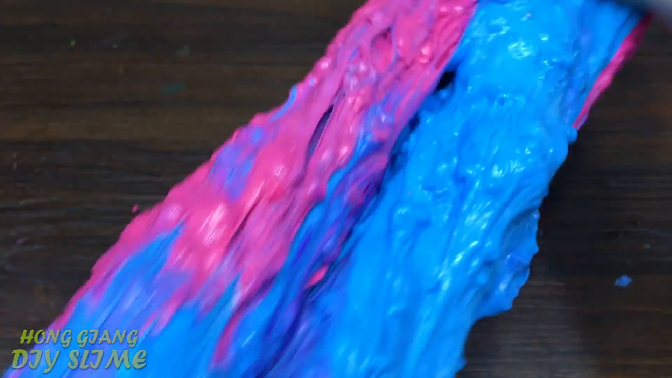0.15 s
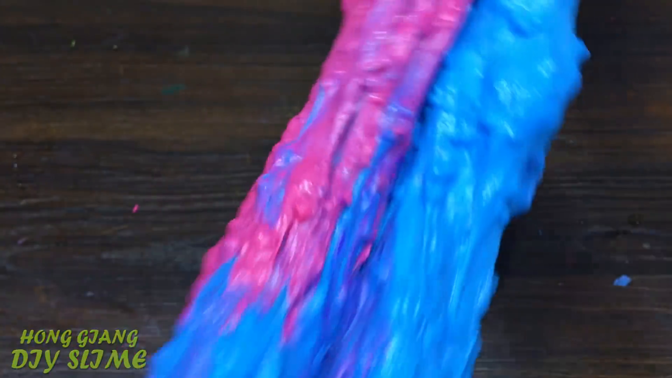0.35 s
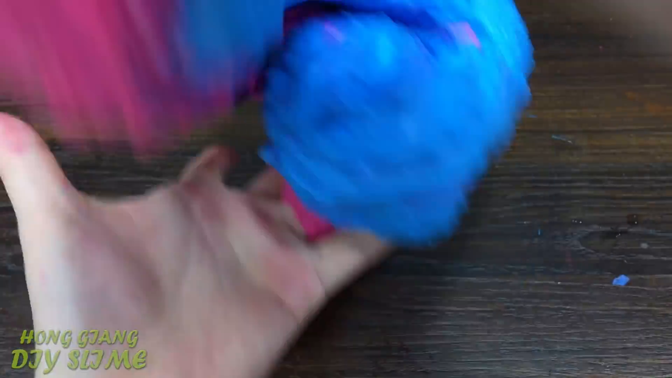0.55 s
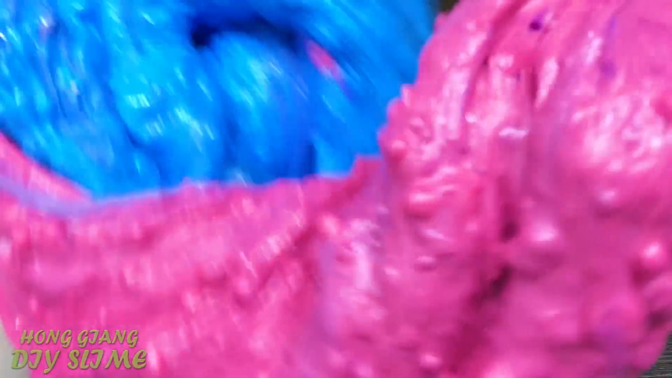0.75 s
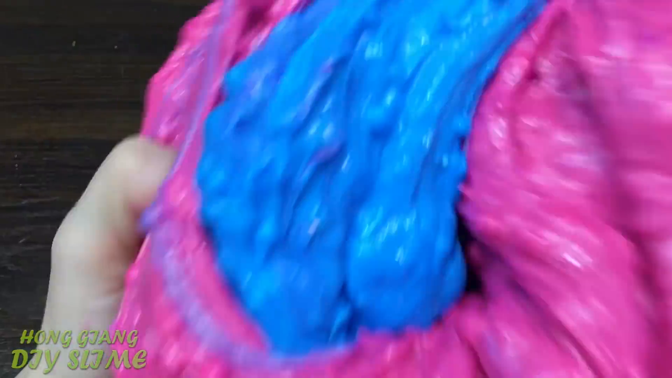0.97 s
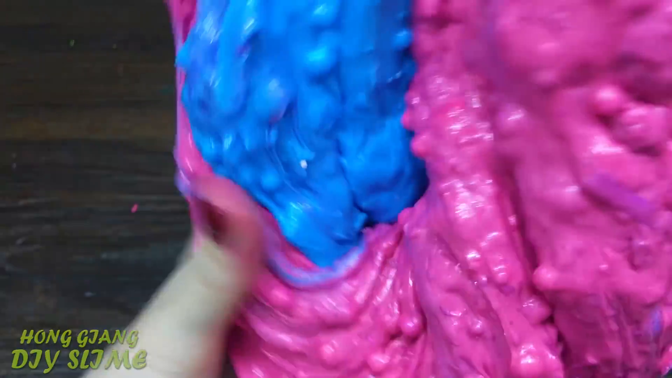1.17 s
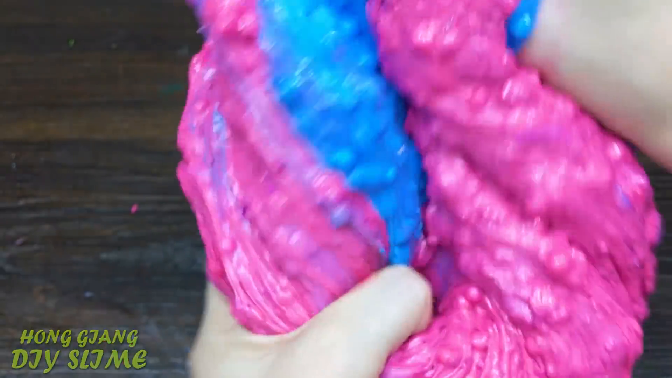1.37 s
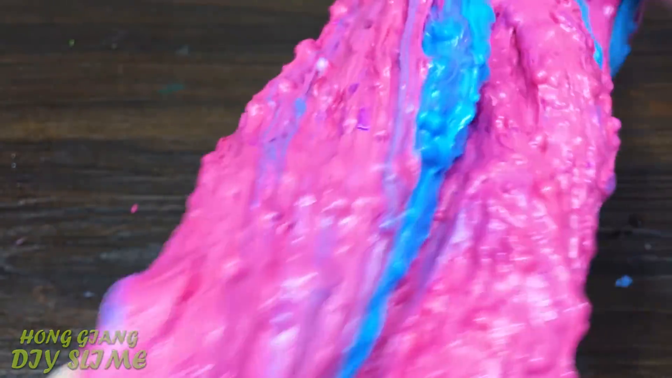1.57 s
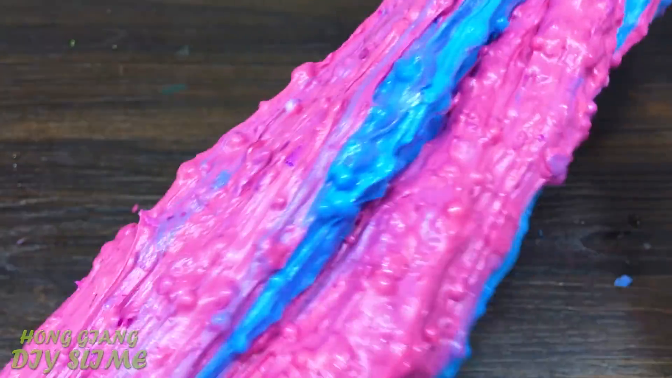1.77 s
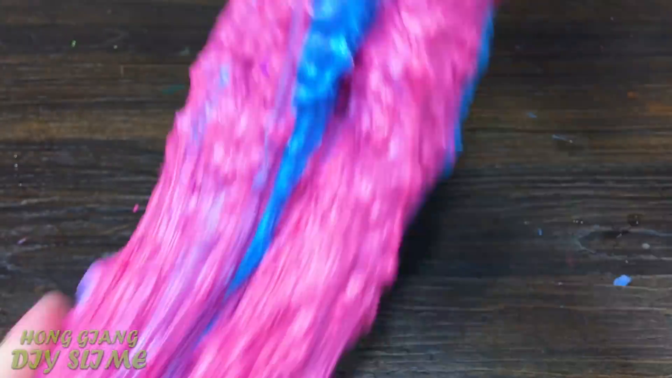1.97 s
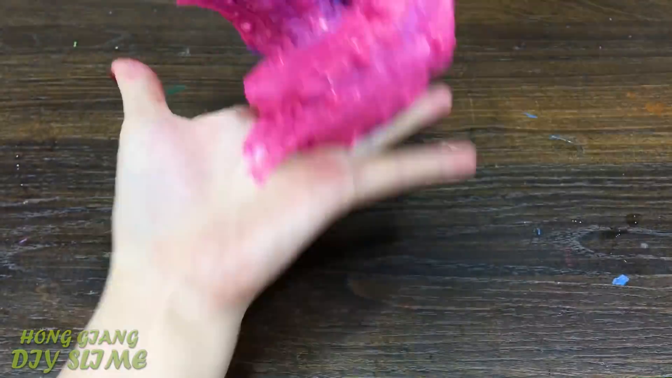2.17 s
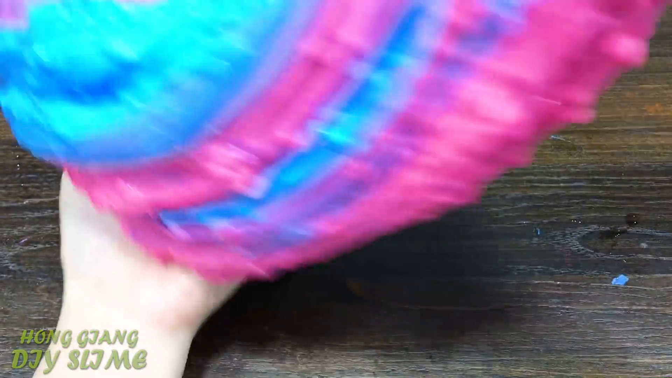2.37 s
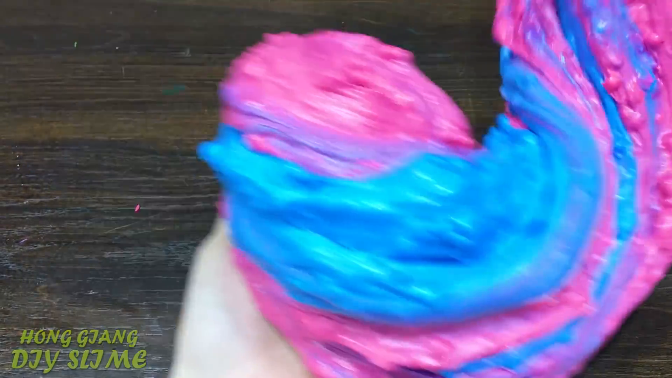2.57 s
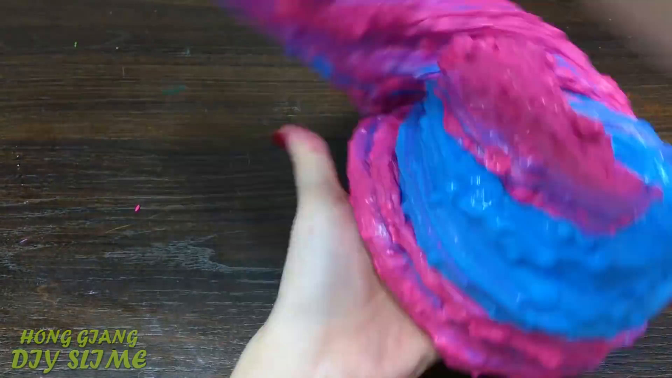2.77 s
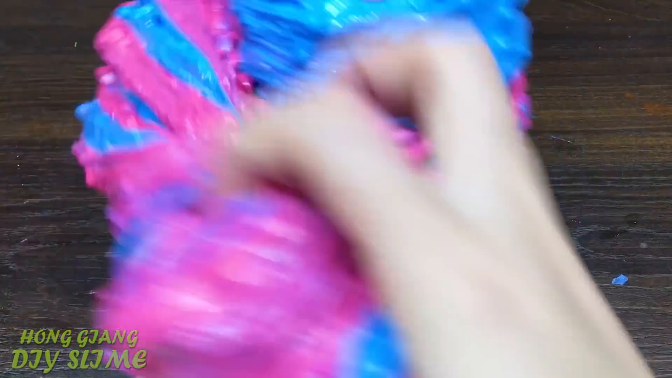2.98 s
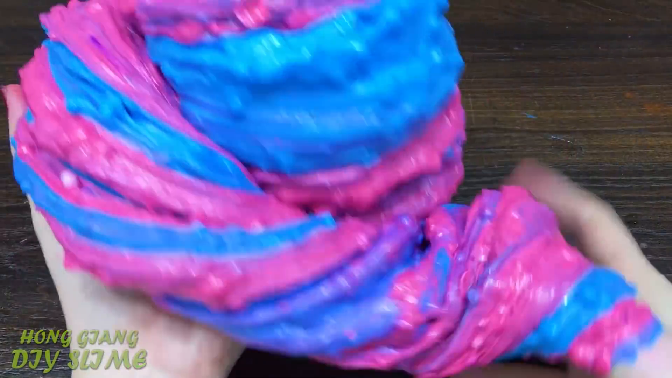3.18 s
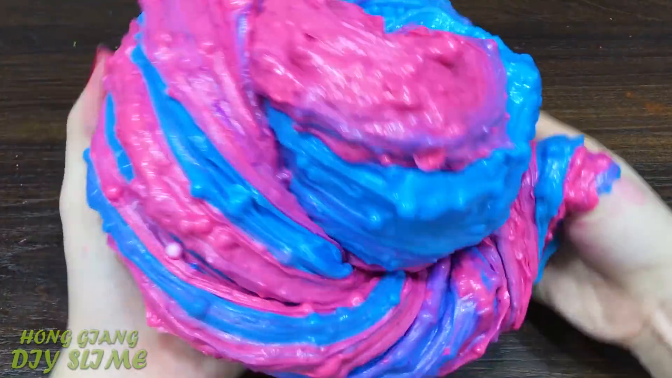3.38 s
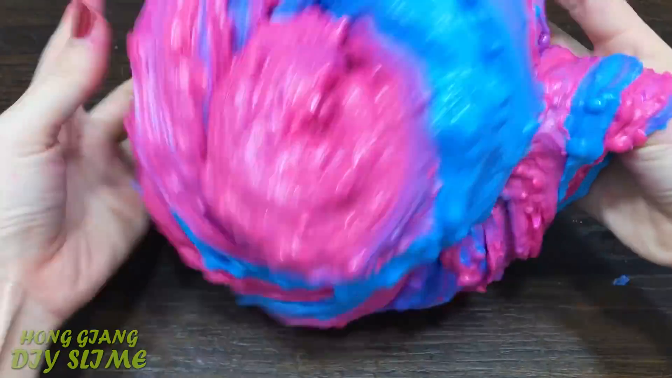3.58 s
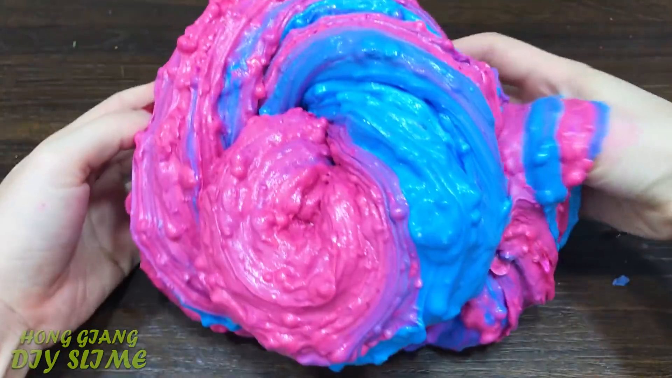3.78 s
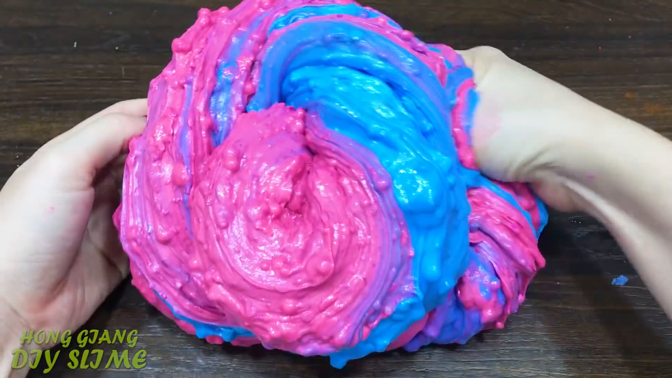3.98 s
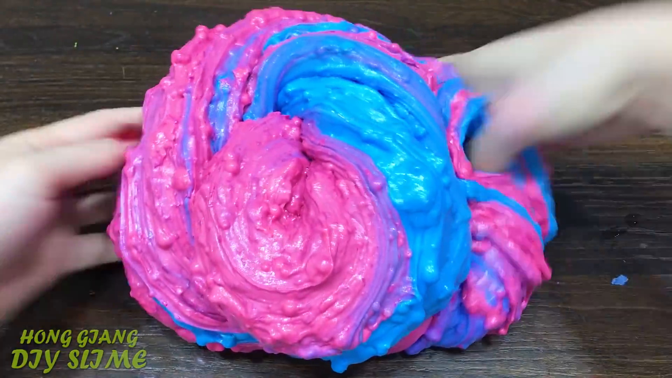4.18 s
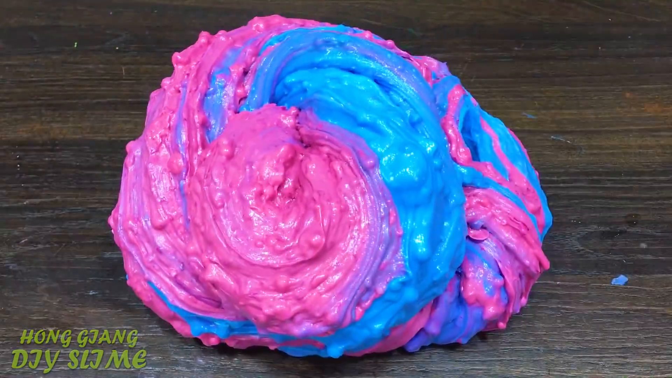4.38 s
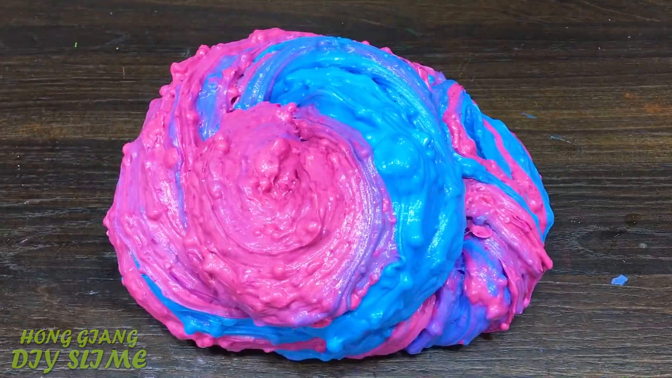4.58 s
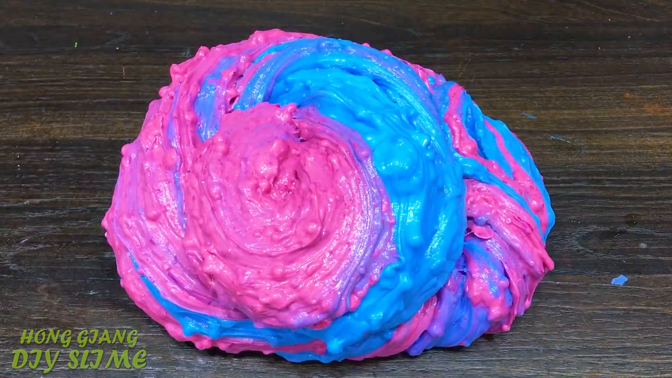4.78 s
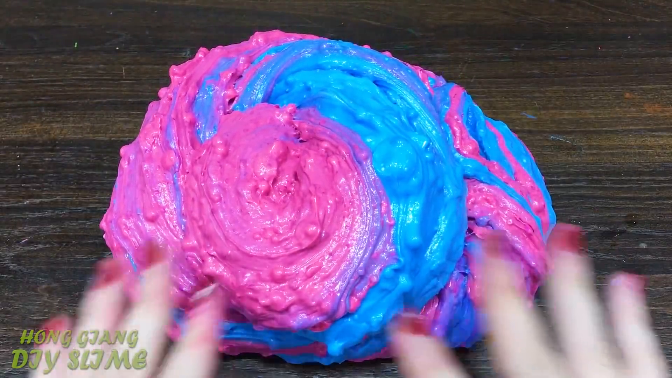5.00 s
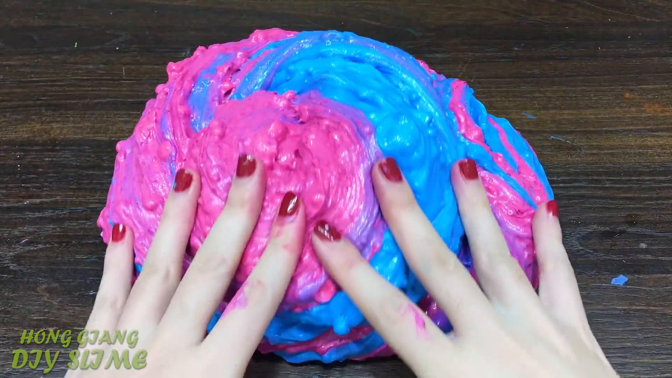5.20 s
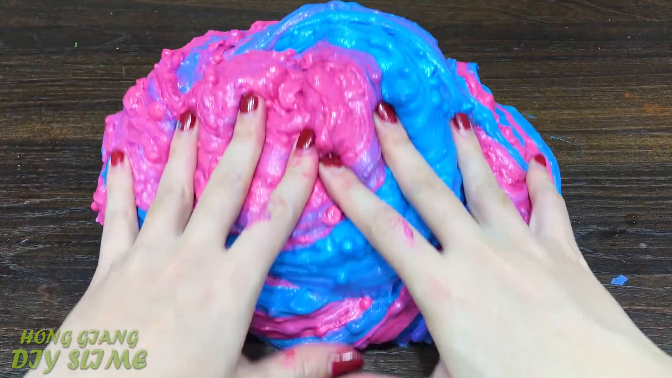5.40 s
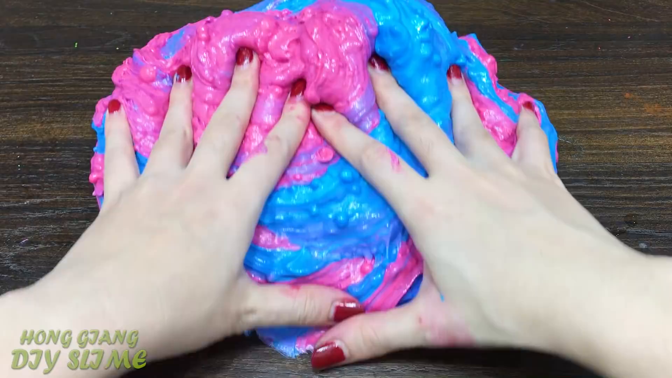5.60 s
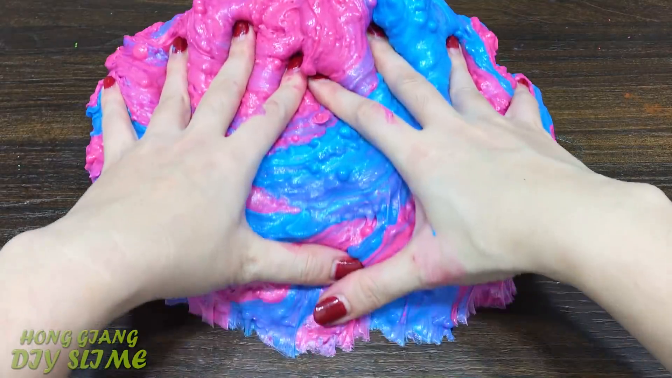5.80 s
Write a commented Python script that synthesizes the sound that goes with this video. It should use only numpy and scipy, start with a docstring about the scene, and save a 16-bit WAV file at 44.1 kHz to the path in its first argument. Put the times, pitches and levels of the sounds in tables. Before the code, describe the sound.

Two hands work a large lump of thick slime on a table in a small quiet room, miked very close. Rapid crackly pulls come first, then a hollow squelch and two very sharp snaps. Strokes thin out into small clicks, a strong wet squish follows, then quiet and a last soft press.

```python
"""Two hands knead a lump of thick, sticky slime on a table, close up in a small, quiet, dry room.
Quick strokes open in fine crackle, made of swarms of tiny ringing bursts over hiss, with dull noise as rub.
Larger bubbles pop one by one; at 1.2 s a fold squeezes air from hollow pockets, as resonant noise,
and two sharp snaps follow near 1.4 s. Strokes grow sparser; the strongest, at 4.3 s, squishes again.
After a lull, the last soft strokes come with a low drone of pressing palms at 5.5 s."""
import sys
import numpy as np
from scipy import signal
from scipy.fft import rfft, irfft, next_fast_len
from scipy.io import wavfile
from scipy.ndimage import map_coordinates

SR = 44100
rng = np.random.default_rng(int(sys.argv[2]) if len(sys.argv) > 2 else 0)


def pcm_store(signal):
    """Save signal as 16-bit PCM."""
    levels = np.round(np.clip(np.atleast_2d(signal), -1, 1) * 32767)
    wavfile.write(sys.argv[1], SR, levels.astype(np.int16).T)


N = 257984
TOP_HZ = 16000  # upper band limit
USUAL_DB = -55  # crackle level of the usual effort


def amp(db):
    """Decibels to gain."""
    return 10 ** (np.asarray(db) / 20)


def unit(x):
    """x at rms 1."""
    return x / np.sqrt(np.mean(x ** 2) + 1e-20)


def along(points, hz):
    """(Hz, value) points read on a log frequency axis."""
    f, value = np.transpose(points)
    return np.interp(np.log(hz + 1), np.log(f + 1), value)


def filtered(x, response):
    """x times a response of frequency, padded so that the end does not wrap round."""
    size = next_fast_len(N + 8192)
    spectrum = rfft(x, size) * response(np.fft.rfftfreq(size, 1 / SR))
    return irfft(spectrum, size)[:N]


def coloured(x, curve):
    """x shaped by (Hz, dB) points, at rms 1."""
    return unit(filtered(x, lambda hz: amp(along(curve, hz))))


def steady(x, span):
    """x with its level evened out over span seconds, at rms 1; faster detail stays."""
    window = signal.windows.hann(int(span * SR) + 3)
    power = signal.fftconvolve(x ** 2, window, "same")
    return unit(x / np.sqrt(np.abs(power) + 1e-3 * power.mean()))


def burst(hz, cycles, t):
    """A torn bubble, at peak 1: its cavity rings for a cycle or two and pushes out no net air."""
    turns = hz * t
    onset = (1 - np.exp(-2 * np.pi * turns)) ** 2
    swing = np.sin(2 * np.pi * turns) * np.exp(-turns / cycles) * onset
    wave = np.diff(swing, prepend=0)
    return wave / np.abs(wave).max(axis=-1, keepdims=True)


def grains(rate, hz, spread, cycles, scatter_db, size):
    """A swarm of tiny bursts of random pitch and strength; rate is per second, for each sample."""
    starts = np.flatnonzero(rng.random(N) < rate / SR)
    pitch, strength, sign = rng.standard_normal((len(starts), 3)).T
    pitch = hz * np.exp(spread * pitch)
    strength = np.sign(sign) * amp(scatter_db * np.minimum(strength, 2))
    strength *= pitch < TOP_HZ  # bursts above the band limit are silent
    waves = burst(pitch[:, None], cycles, np.arange(size) / SR)
    waves = (strength * np.sqrt(pitch))[:, None] * waves
    places = starts[:, None] + np.arange(size)
    return unit(np.bincount(places.ravel(), waves.ravel(), N + size)[:N])


def crackle(level_db, curve, rate, hz, spread, cycles, scatter_db, hiss, size):
    """Slime peeling and tearing: harder work bursts more bubbles, over a hiss of escaping air."""
    density = rate * amp(.4 * (level_db - USUAL_DB))
    swarm = steady(grains(density, hz, spread, cycles, scatter_db, size), span=.05)
    # the surface lets go in little jerks: a random level, 90 knots per second
    knots = np.arange(N) * 90 / SR
    jerks = amp(2.1023 * map_coordinates(rng.standard_normal(int(knots[-1]) + 4), [knots]))
    return amp(level_db) * coloured(jerks * (swarm + hiss * rng.standard_normal(N)), curve)


# Tone of the surface crackle: (frequency [Hz], gain [dB])
SURFACE_TONE = [(1500, -22), (2600, -1), (3400, -3.5), (4700, 0.5), (6500, -4.5), (8500, -2.3018),
                (12300, -3.5), (13500, -3), (15500, -1.5), (16500, -24.5)]
SURFACE_DB = -0.6  # balance in the mix


def surface_crackle(level_db):
    """Fine threads and bubbles bursting on the surface, as a dense swarm of high, short rings."""
    fine = crackle(level_db, SURFACE_TONE, rate=3000, hz=7332.9, spread=.5,
                   cycles=1.7, scatter_db=6, hiss=0.68, size=120)
    return amp(SURFACE_DB) * fine


# Tone of the squelch: (frequency [Hz], gain [dB])
SQUELCH_TONE = [(250, -26.5), (500, -6), (750, -3), (1050, -7), (1600, -3.5), (2500, -3.5), (3600, -6.5),
                (7000, -33.5)]
SQUELCH_DB = -0.3  # balance in the mix


def squelch(level_db):
    """Wetter bursts inside the lump, as a sparser swarm of lower, quickly damped rings."""
    wet = crackle(level_db, SQUELCH_TONE, rate=1200, hz=1537.3, spread=0.566,
                  cycles=.9, scatter_db=3.5, hiss=.35, size=320)
    return amp(SQUELCH_DB) * wet


# Tone of the rub: (frequency [Hz], gain [dB])
RUB_TONE = [(25, -41), (60, -1.5), (110, -0.5), (200, -3.5), (350, 0), (550, -7), (900, -16), (2500, -57.5)]
RUB_DB = -0.8  # balance in the mix


def rub(level_db):
    """The dull rub of skin on the mass, as low, steadied noise."""
    noise = coloured(rng.standard_normal(N), RUB_TONE)
    return amp(RUB_DB) * amp(level_db) * steady(noise, span=0.089)


# Pulls and squeezes of the hands, levels before the mix balance: (time at full effort [s], hold [s],
# rise [s], fall [s], crackle level [dB], squelch over crackle [dB], rub over crackle [dB])
HAND_STROKES = [ (0.0, .06, .02, .05, -48.5, -4, -11), (0.17, .04, .04, .03, -50, -4, -13),
                (0.293, .048, .018, 0.03498, -49, -9, -9), (0.4, 0.009425, 0.008226, 0.06752, -51, 1, -1),
                (0.505, 0.05357, 0.014348, 0.044777, -51, -7, -9.5),
                (0.732, 0.004849, 0.012464, 0.019633, -61, -4, 2),
                (0.858, 0.019283, 0.023584, 0.06217, -55, -1, -2.5),
                (1.05, 0.004853, 0.040893, 0.03034, -62, -6, 3.5),
                (1.182, 0.013006, 0.032856, 0.05073, -41, -9, -6),
                (1.405, 0.56204, 0.0080733, .14, -55.5, -5, -4.5),
                (1.51, 0.029298, 0.01199, 0.030092, -49.5, -8, -9),
                (1.71, 0.06048, 0.020605, 0.041204, -51, -10, -22),
                (1.95, .035, 0.029767, .012, -53, -5, -7),
                (2.205, 0.004855, 0.022855, 0.017858, -55.5, -5, -17.5),
                (2.495, 0.005287, 0.0051073, 0.019936, -54.5, -10, -16),
                (2.62, 0.007851, 0.034432, 0.027642, -60, -1, -4.5),
                (2.777, 0.019637, 0.010104, 0.04008, -59.5, -2, -3),
                (2.87, 0.033016, 0.02471, 0.028755, -59, -1, 0.5),
                (3.046, .006, .014, 0.012088, -51, -5, -11), (3.071, .005, .006, .008, -53, -1, -7),
                (3.112, 0.00597, 0.010132, 0.014873, -56, -4, -9.5),
                (3.303, .015, 0.030984, .007, -53.5, -8, -6), (3.341, 0.007205, 0.0050094, .035, -55, 4, 3),
                (3.568, .02, .011, .025, -48.5, -1, -4), (3.604, .014, .012, 0.035233, -43, -7, -7),
                (3.7, 0.039224, 0.031163, 0.03902, -58, -2.5, 2),
                (3.958, 0.006042, 0.015156, 0.030052, -59, -8, -3.5),
                (4.023, 0.004797, 0.008084, .02, -59, -7, -6),
                (4.159, 0.041227, 0.059515, 0.029814, -63, 1, -2),
                (4.308, 0.03125, 0.015144, 0.020195, -37, -1.5, -9.5),
                (4.977, 0.004403, 0.009951, 0.02773, -72, 0, -8.5),
                (5.371, 0.10044, 0.05834, 0.030316, -72.5, -1, 1),
                (5.504, 0.014977, 0.012237, 0.02563, -61, -5, -5.5),
                (5.569, 0.02838, 0.031204, 0.3522, -68, -4, -1)]
# The lump clings faintly while it is held: same columns
CLINGING_GRIP = (0.0, 4, .02, 0.0152, -74, -7, 1)


def effort():
    """Each stroke rises, holds and lets go; gives the dB of crackle, squelch and rub for each sample."""
    t = np.arange(0, N + 64, 32) / SR
    power = 1e-9  # floor
    for s, hold, rise, fall, db, squelch_db, rub_db in HAND_STROKES + [CLINGING_GRIP]:
        before = np.maximum(s - t, 0)
        after = np.maximum(t - s - hold, 0)
        push = np.exp(-before / rise - after / fall)
        power = power + np.outer(amp([db, db + squelch_db, db + rub_db]), push) ** 2
    return [np.interp(np.arange(N) / SR, t, level_db) for level_db in 10 * np.log10(power)]


# The larger bubbles: (time [s], peak level without the plop [dB], ring [Hz], film snap share [0-1])
LARGE_BUBBLES = [(0.017, -29, 1760, 0), (0.022, -31.5, 1237, 0), (0.0433, -25, 7000, .5),
                 (0.0876, -28.5, 4240, .05), (0.131, -23.5, 4021, 0.18), (0.1575, -28, 1645, 0.01),
                 (0.174, -34, 1632, 0), (0.195, -27, 9024, 0.62), (0.2028, -32.5, 1506, 0),
                 (0.234, -28.5, 1950, 0), (0.246, -25.5, 4339, 0.54), (0.313, -26, 8540, 0.55),
                 (0.321, -26.5, 4351, 0.38), (0.3968, -35, 768.7, 0.6), (0.5715, -27, 8500, 0.49),
                 (0.643, -37.5, 11970, 0.52), (0.7386, -34.5, 4808, 0), (0.8263, -38, 963.7, 0.01),
                 (0.8551, -25, 11970, .5), (0.871, -30.5, 1651, 0.1), (0.8933, -31, 1220, 0.88),
                 (0.8973, -35, 422.9, 0.89), (0.926, -25.5, 2600, .12), (0.9412, -30, 1821, 0.48),
                 (0.9426, -39, 297.5, .4), (0.9824, -28.5, 8898, 0.43), (1.0739, -23, 2380, .12),
                 (1.099, -28, 5759, 0.31), (1.106, -29.5, 2409, 0.85), (1.2916, -24, 8622, 0.55),
                 (1.319, -35, 7997, 0.76), (1.3945, -3.5, 10200, 0.24), (1.4188, 0, 11190, 0.5),
                 (1.4192, -29, 1550, .15), (1.506, -30, 5863, 0.17), (1.7017, -19.5, 4925, 0.03),
                 (1.7076, -26, 5300, .2), (1.718, -27.5, 4903, 0.31), (1.748, -19, 5048, 0.4),
                 (1.784, -24.5, 8352, 0.51), (1.865, -30, 8200, .6), (2.206, -32.5, 4184, .7),
                 (2.3073, -44, 2977, .8), (2.498, -31, 6000, 0.42), (2.8655, -41, 1471, .5),
                 (2.8873, -39, 1270, 0.23), (3.046, -24.5, 7102, 0.45), (3.0521, -43, 543, .02),
                 (3.0722, -34.5, 950, 0.82), (3.1132, -39, 1008, 0.7), (3.1575, -38.5, 7460, 0.51),
                 (3.261, -26.5, 11520, 0.01), (3.3166, -31.5, 5887, .6), (3.3374, -33.5, 1629, 0.33),
                 (3.344, -35, 970, .6), (3.3613, -23.5, 5933, .8), (3.4596, -37.5, 9152, 0.59),
                 (3.5644, -25.5, 6933, 0.71), (3.609, -26, 4131, .23), (3.6146, -23.5, 4948, 0.2),
                 (3.745, -28, 4856, .6), (3.7687, -31, 5902, .5), (3.9463, -30.5, 11990, 0.17),
                 (4.0257, -32, 11960, 0.04), (4.0915, -42, 2021, .3), (4.1746, -46, 479.9, 0.29),
                 (4.1966, -40.5, 2449, 0.14), (4.1256, -30, 7303, 0.54), (4.1649, -32.5, 10630, 0.05),
                 (4.3228, -21.5, 3329, 0.06), (4.3698, -22.5, 11210, .2), (5.2921, -37, 8968, 0.32),
                 (5.3093, -40.5, 4231, 0.25), (5.3766, -30, 3120, .45), (5.4926, -37.5, 1472, 0.55),
                 (5.5015, -42, 1500, .6), (5.5193, -35.5, 5970, .2), (5.523, -38.5, 3010, .05),
                 (5.5752, -33, 11730, 0.2), (5.6351, -43, 2100, .8)]
# every burst also gives the soft mass a short, low plop
PLOP_HZ, PLOP_DB = 560, -17.5  # its ring, and its level beside the pop of a large bubble
LARGE_HZ, PLOP_FALLS = 2296.3, 1.4315  # bubbles that ring higher plop less, by this power of pitch


def pops(bubbles, size=900, count=3):
    """Each bubble's film snaps and its cavity rings; the tear takes a few small neighbours with it."""
    out, t = np.zeros(N + 2 * size), np.arange(size) / SR
    film = burst(6500, 0.32, t)
    low_plop = amp(PLOP_DB) * burst(PLOP_HZ, 0.5061, t)
    for s, db, hz, snap in bubbles:
        snap = np.clip(snap, .01, .8)
        # the smallest cavities barely ring
        ring = burst(hz, np.clip(.9 - (hz / 16000) ** 2, .4, 2), t)
        sizzle = np.convolve(rng.standard_normal(size), [1, 1, -1, -1], "same") * np.exp(-t / .001)
        pop = np.sqrt(1 - snap) * ring + np.sqrt(snap) * (film + 0.088 * sizzle)
        plop = min(1, LARGE_HZ / hz) ** PLOP_FALLS * low_plop
        out[int(s * SR):][:size] += amp(db) * (pop / np.abs(pop).max() + plop)
        # neighbours stay small, however hard the main bubble snaps
        neighbour_db = min(db, -22) - 11.5
        for lag, pitch, strength in rng.standard_normal((count, 3)):
            near_hz = np.clip(.8 * hz * np.exp(.6 * pitch), 200, 12000)
            start = max(0, int((s + .0004 + .0008 * lag) * SR))
            gain = amp(neighbour_db + 2 * strength) * np.sqrt(near_hz / hz)
            out[start:][:size] += gain * burst(near_hz, 1.2, t)
    return out[:N]


STRAY_PER_S, STRAY_HZ, STRAY_SPREAD = 28, 5200, .6  # rate at usual effort, typical ring, log spread
STRAY_DB, STRAY_SCATTER_DB, STRAY_GROWS = -36, 3.5, 0.6348  # peak at usual effort, spread, dB per dB
STRAY_DB_PER_OCTAVE = 3.5  # the smaller the bubble, the sharper its peak
STRAY_DOUBLES_DB, STRAY_MOST_PER_S = 5, 95  # the rate doubles with this much more effort, up to a limit


def stray_bubbles(work_db, count=700):
    """Small bubbles at random moments, more and louder with harder work; rows as in LARGE_BUBBLES."""
    moment, luck, snap = rng.random((count, 3)).T
    strength, pitch = np.clip(rng.standard_normal((count, 2)), -2, 1.5).T
    push_db = work_db[(moment * N).astype(int)] - USUAL_DB
    rate = np.minimum(STRAY_PER_S * 2 ** (push_db / STRAY_DOUBLES_DB), STRAY_MOST_PER_S)
    hz = np.minimum(STRAY_HZ * np.exp(STRAY_SPREAD * pitch), 12000)
    db = STRAY_DB + STRAY_GROWS * push_db + STRAY_SCATTER_DB * strength
    db += STRAY_DB_PER_OCTAVE * np.log2(hz / STRAY_HZ)
    # of the candidates, keep as many as the rate asks for
    kept = luck < rate * N / SR / count
    return list(np.column_stack([moment * N / SR, db, hz, snap])[kept])


def resonance(s, db, hz, width, rise, fall):
    """A hollow resonance, fluttering as the push on it swells and lets go."""
    t = np.arange(N) / SR - s
    swell = np.exp(-np.abs(t / np.where(t < 0, rise, fall)) ** 1.3)

    def stage(f):
        return 1j * f * width / (hz * hz - f * f + 1j * f * width)

    # two stages in a row make one peak with steep skirts
    ring = filtered(rng.standard_normal(N), lambda f: stage(f) ** 2)
    return amp(db) * swell * steady(ring, span=.04)


# Air pockets squeezed by a fold:
# (peak time [s], rms level at the peak [dB], resonance [Hz], width [Hz], rise [s], fall [s])
AIR_POCKETS = [ (0.020, -48, 360, 130, .015, .02), (1.137, -48.5, 520, 140, .015, .014),
               (1.150, -38, 335, 100, .012, .01), (1.181, -32.5, 332, 80, .014, .022),
               (1.178, -48.5, 740, 250, .022, .018), (1.170, -47, 4600, 800, .035, .05),
               (1.222, -42, 290, 150, .01, .035), (3.344, -48, 130, 65, .012, .016),
               (3.580, -39.5, 265, 130, .014, .055), (4.308, -42, 345, 170, .02, .05),
               (4.333, -42.5, 224, 65, .035, .04), (4.325, -48.5, 615, 100, .025, .025),
               (4.336, -36.8, 1670, 280, .016, .015), (4.330, -41, 3200, 550, .02, .018), ]


def squishes():
    """Air forced through the pockets that the folds have trapped, as swells of resonant noise."""
    return sum(resonance(*pocket) for pocket in AIR_POCKETS)


# The palms pressing down:
# (peak time [s], rms level at the peak [dB], resonance [Hz], width [Hz], rise [s], fall [s])
PALM_PRESS = (5.55, -63, 121, 10, .11, .15)


def press_drone():
    """A low drone while the palms press down, as a narrow band of noise."""
    return resonance(*PALM_PRESS)


# Decay of the room: (frequency [Hz], time to fall by 60 dB [s])
WALL_DECAY = [(150, 0.44), (1500, 0.4), (6000, 0.46), (15000, .12)]
ROOM_DB = -22.5  # reverberation beside the dry slime


def room(x):
    """The walls answer faintly with a decaying noise tail whose highest treble dies first."""
    hz, t, z = signal.stft(rng.standard_normal(SR // 2), SR, nperseg=256)
    decay = amp(-60 * t / along(WALL_DECAY, hz)[:, None])
    tail = signal.istft(z * decay, SR, nperseg=256)[1]
    tail *= 1 - np.exp(-(np.arange(len(tail)) / SR / 0.005) ** 2)  # soft onset over some 5 ms
    return amp(ROOM_DB) * signal.fftconvolve(x, tail / np.linalg.norm(tail))[:N]


# Tone of the quiet room: (frequency [Hz], gain [dB])
AIR_TONE = [(20, -29.5), (35, -19), (55, -2.5), (80, 0), (160, -6), (300, -9.5), (600, -18), (1500, -22),
            (6000, -28), (15500, -31.5)]
AIR_DB = -65.5  # rms level


def quiet_air():
    """The faint, mostly low noise of the quiet room."""
    return amp(AIR_DB) * coloured(rng.standard_normal(N), AIR_TONE)


def scene():
    """Slime and table in the quiet room."""
    fine_db, wet_db, rub_db = effort()
    kneading = surface_crackle(fine_db) + squelch(wet_db) + rub(rub_db)
    bubbles = pops(LARGE_BUBBLES + stray_bubbles(fine_db))
    slime = kneading + bubbles + squishes() + press_drone()
    return (slime + room(slime) + quiet_air())[None]


def record(dry):
    """A very steep low-pass leaves almost nothing above the band limit."""
    return filtered(dry[0], lambda hz: 1 / np.sqrt(1 + (hz / TOP_HZ) ** 160))[None]


dry = scene()
out = record(dry)
pcm_store(out)
```